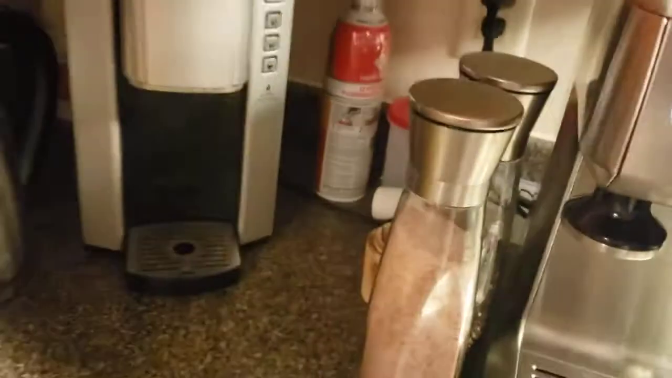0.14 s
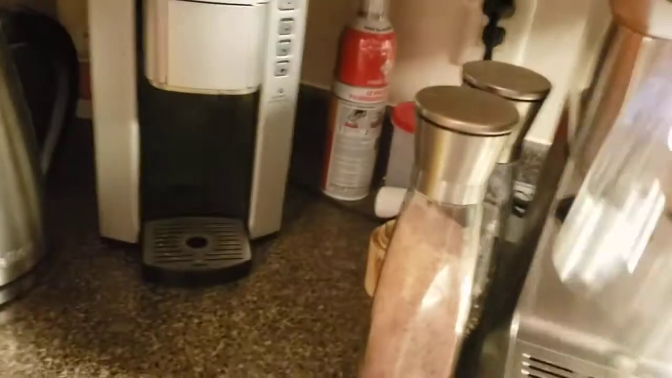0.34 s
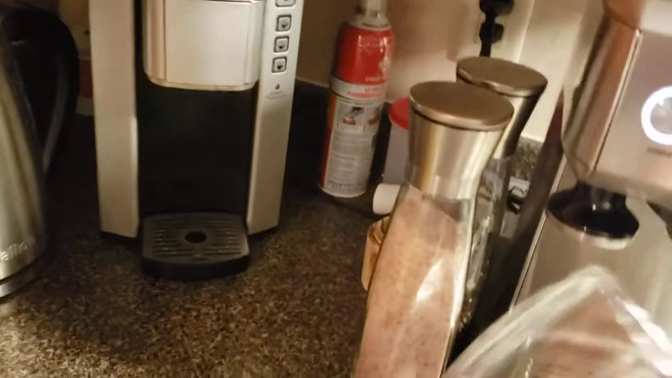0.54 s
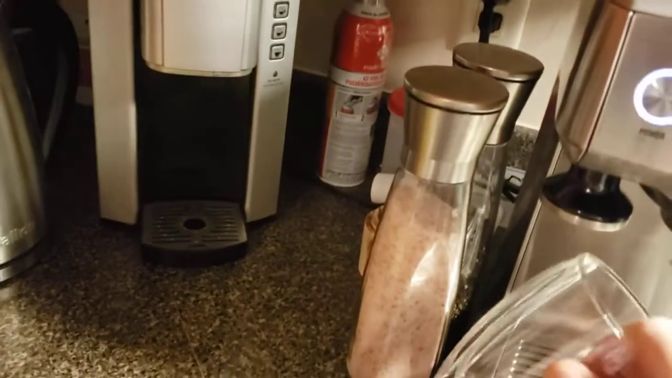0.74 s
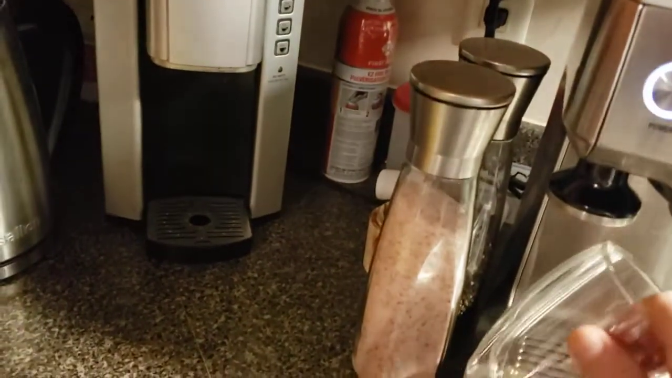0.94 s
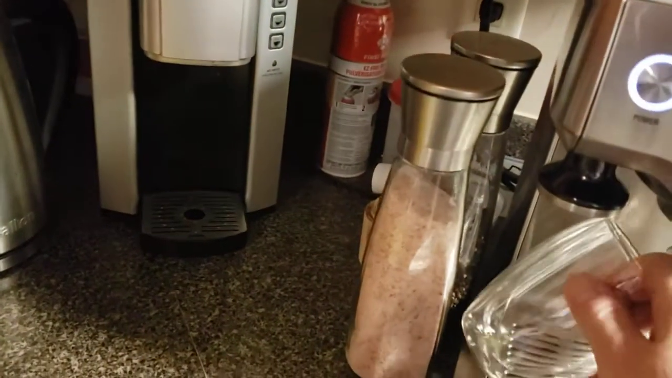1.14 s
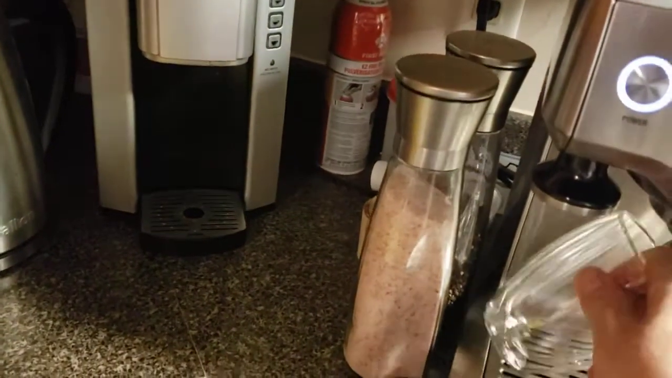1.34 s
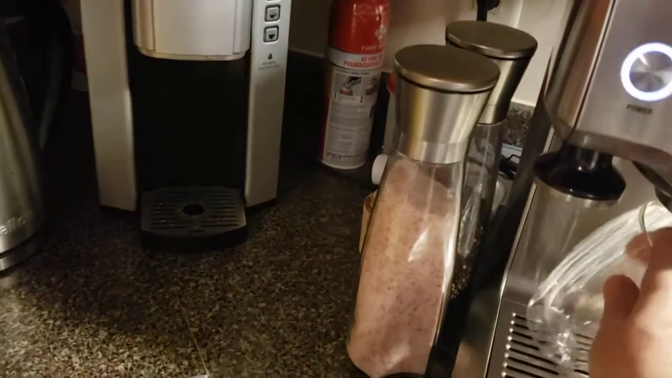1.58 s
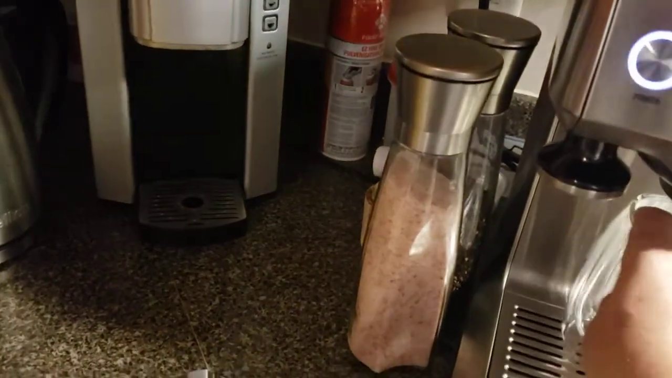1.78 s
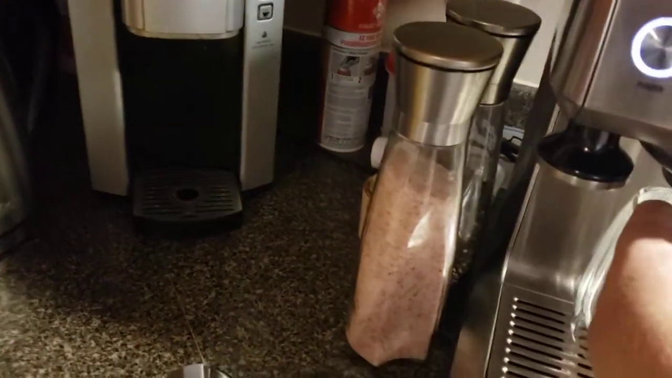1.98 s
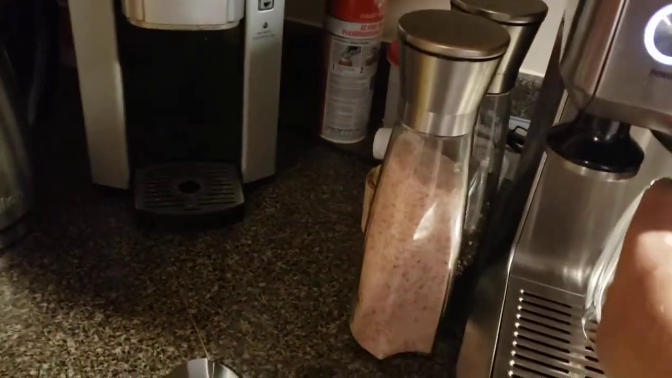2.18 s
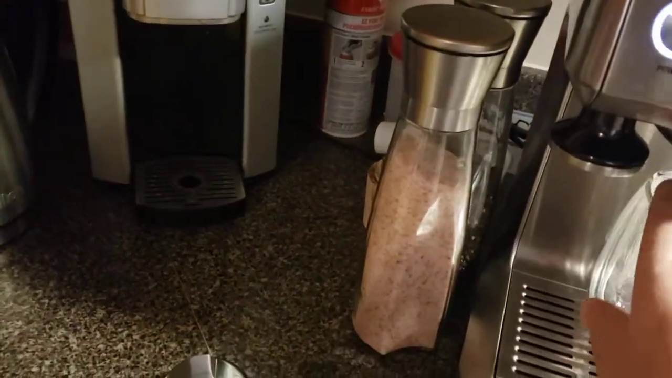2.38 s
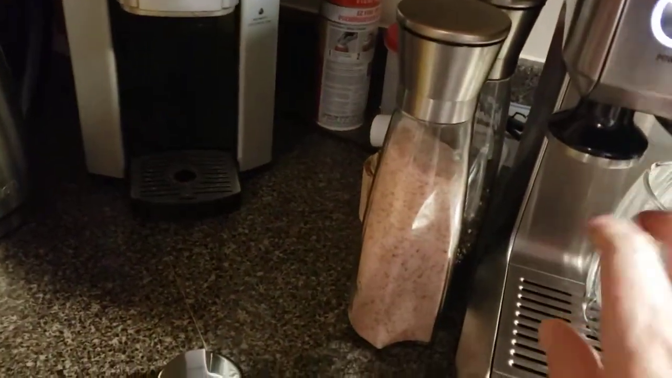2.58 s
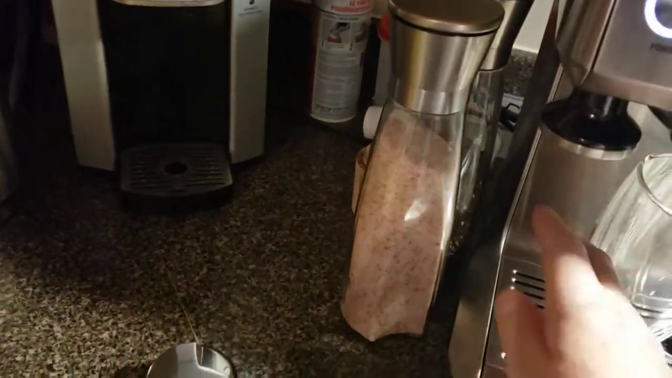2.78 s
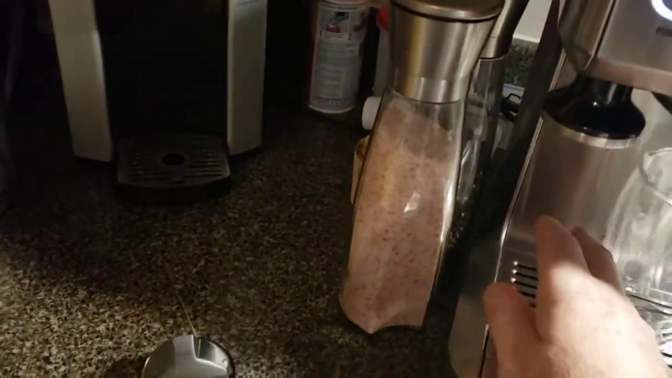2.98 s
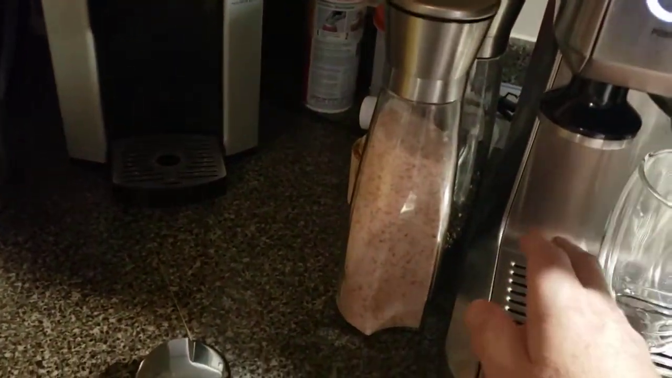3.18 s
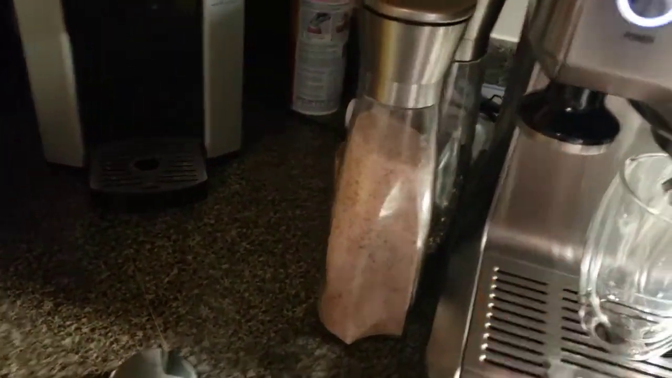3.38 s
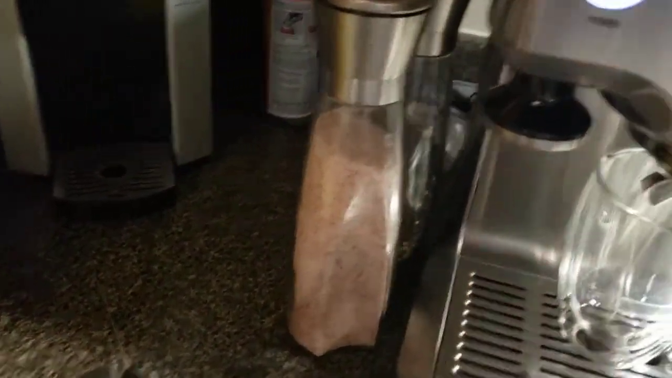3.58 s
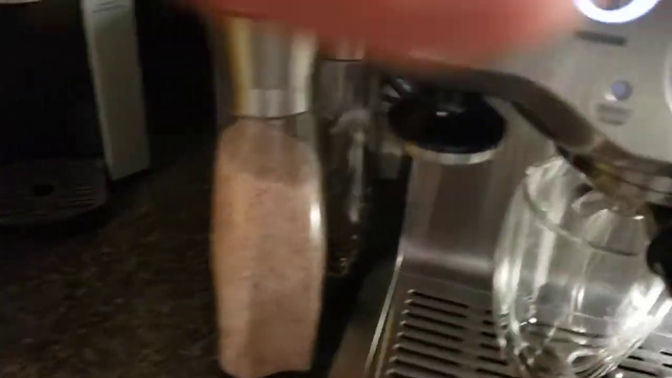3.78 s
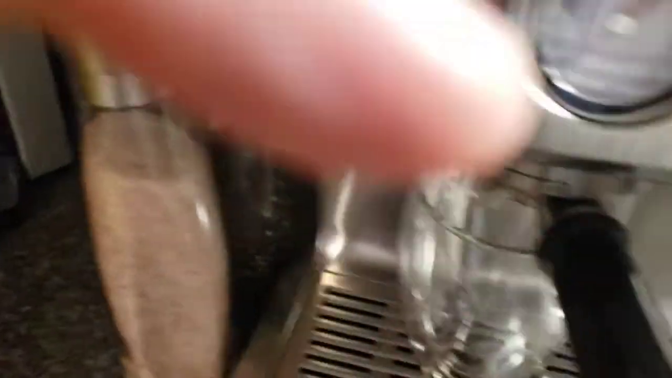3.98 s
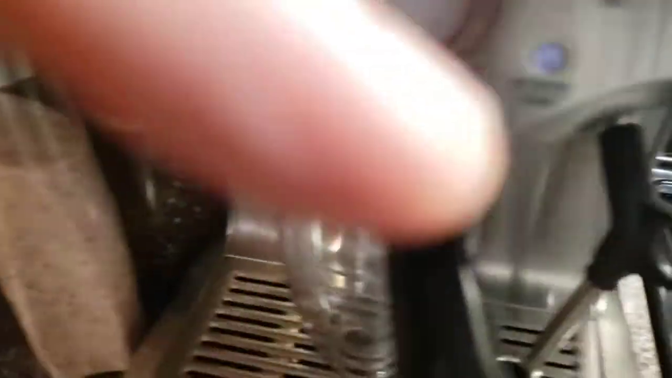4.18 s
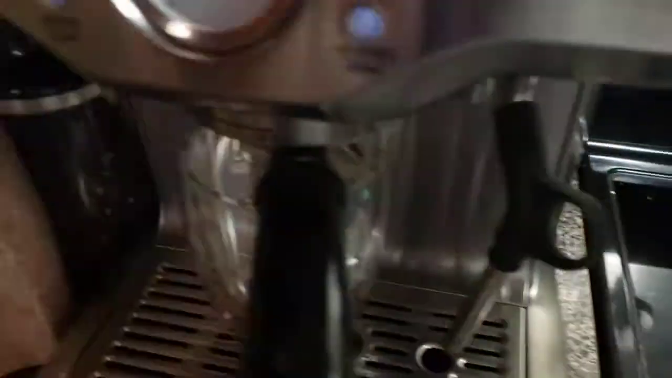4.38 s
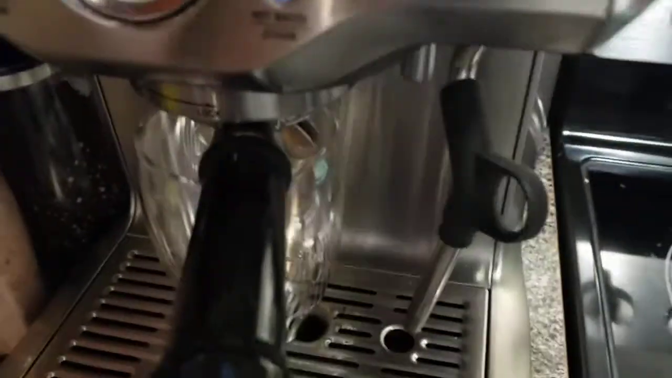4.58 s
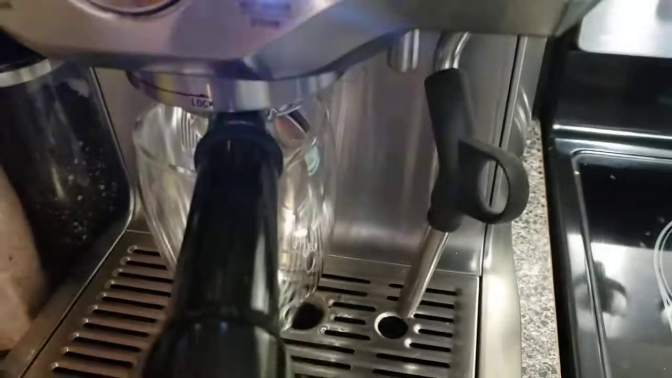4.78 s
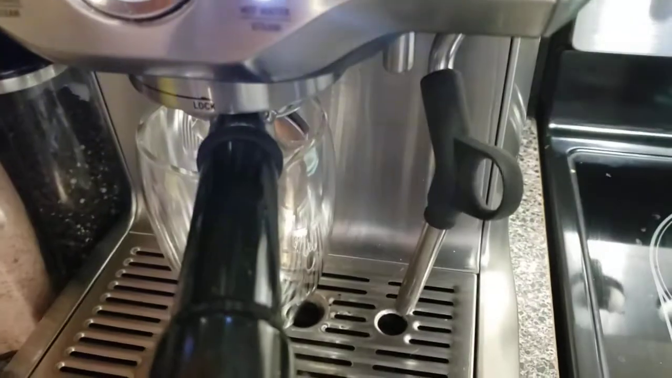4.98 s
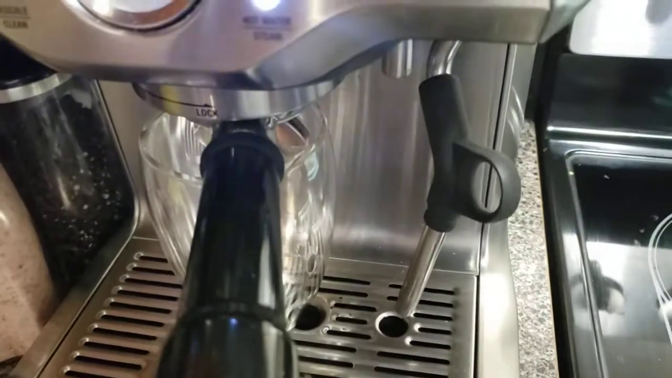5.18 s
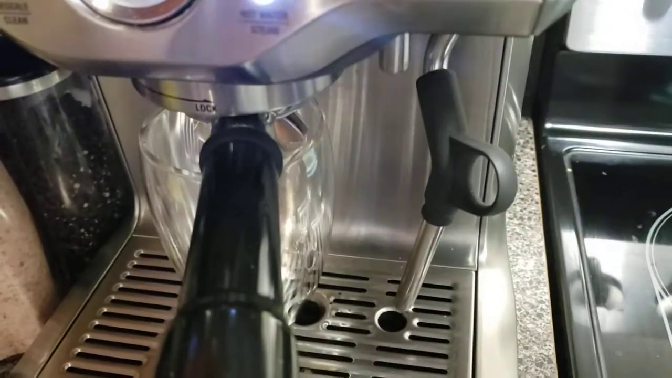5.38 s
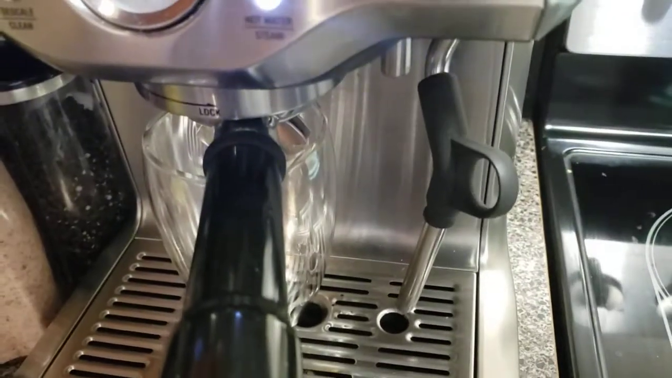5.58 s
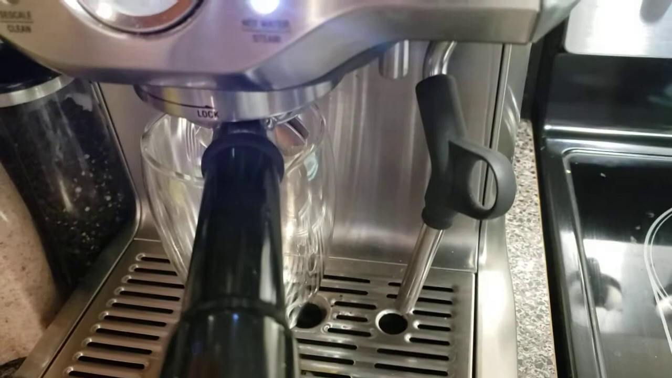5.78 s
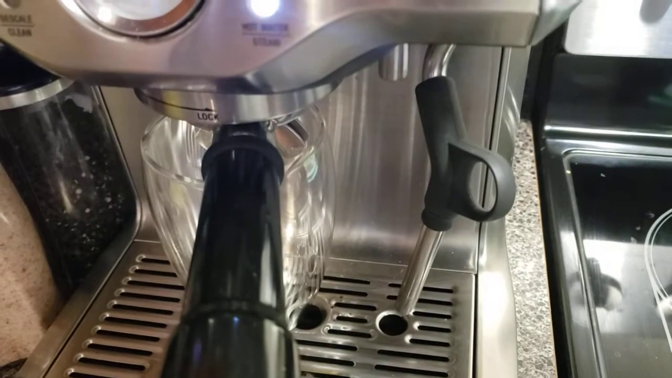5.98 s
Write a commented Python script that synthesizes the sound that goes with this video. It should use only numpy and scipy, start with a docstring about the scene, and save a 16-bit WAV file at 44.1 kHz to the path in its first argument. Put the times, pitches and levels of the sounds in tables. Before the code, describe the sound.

A glass jug squeaks, knocks and chatters on a metal drip tray, then a button clicks and an espresso machine's pump buzzes steadily.

```python
"""Espresso machine in a small kitchen, heard close up by a hand-held phone over faint air noise and hum.
A glass jug squeaks off the counter (noise-driven resonance) amid dull bumps, finger scuffs and taps.
From 1.4 s it knocks, slides and sings on the steel (noise cracks, decaying modes, grainy noise); from 2.3 s
its foot chatters on the drip tray. From 4.55 s a button clicks and the valve snaps; at 4.84 s the vibration
pump starts to buzz (harmonics plus noise bursts at each stroke)."""
import sys
import numpy as np
from scipy import signal
from scipy.fft import rfft, irfft, next_fast_len
from scipy.io import wavfile

SR = 44100
rng = np.random.default_rng(int(sys.argv[2]) if len(sys.argv) > 2 else 0)


def put_to_file(sound):
    """Save the sound as 16-bit audio at rate SR, in the file named by the first command-line argument."""
    columns = np.atleast_2d(sound).T  # one column per channel
    safe = np.clip(columns, -1, 1)
    whole_steps = np.round(safe * 32767)
    wavfile.write(sys.argv[1], SR, whole_steps.astype(np.int16))


N = 266364
T = np.arange(N) / SR
STROKE_HZ, FIRST_STROKE_S = 59.95, 4.8418

# edges of the five bands of a crack: f/Hz
BANDS_HZ = [170, 1000, 2700, 4500, 10000, 16000]


def amp(db):
    """Decibels to gain."""
    return 10 ** (np.asarray(db) / 20)


def unit(x):
    """Scale to rms 1."""
    return x / np.sqrt(np.mean(x ** 2))


def colour(x, points):
    """Filter by a spectrum of (f/Hz, gain/dB) points, joined over log frequency."""
    hz, db = np.transpose(points)
    size = next_fast_len(x.shape[-1] + 2048)
    f = np.maximum(np.fft.rfftfreq(size, 1 / SR), 1)
    gain = amp(np.interp(np.log(f), np.log(hz), db))
    return irfft(rfft(x, size) * gain, size)[..., :x.shape[-1]]


def band(x, lo_hz, hi_hz, order=3):
    """Causal band-pass."""
    edges_hz = [lo_hz, min(hi_hz, SR / 2 - 1)]
    return signal.sosfilt(signal.butter(order, edges_hz, "band", fs=SR, output="sos"), x)


def noise(size, apart_hz=1500):
    """Noise at two close ports: alike in the bass, unrelated in the treble."""
    mid, side = rng.standard_normal((2, size))
    side = signal.sosfilt(signal.butter(1, apart_hz, "high", fs=SR, output="sos"), side)
    return np.array([mid + side, mid - side])


def walk(rate_hz):
    """Random curve with a spread near 1: a new target rate_hz times a second, held after 4096 targets."""
    return 1.2 * np.interp(T * rate_hz, np.arange(4096), rng.standard_normal(4096))


def add(out, s, sound):
    """Mix a sound in at time s."""
    i = max(int(s * SR), 0)
    out[:, i:i + sound.shape[-1]] += sound[..., :N - i]


def fade(t, t60):
    """Exponential decay, 60 dB in t60 seconds."""
    return np.exp(-np.log(1000) * t / t60)


def swell(s, half_s):
    """A smooth rise and fall that peaks at time s."""
    return np.exp(-((T - s) / half_s) ** 2)


def held(start_s, end_s, attack_s, t60):
    """Attack, hold and release."""
    return np.clip((T - start_s) / attack_s, 0, 1) * fade(np.maximum(T - end_s, 0), t60)


def narrow(hz, width_hz):
    """A resonance kept going by an uneven push."""
    phase = 2 * np.pi * np.cumsum(hz * np.ones(N)) / SR
    return unit(walk(width_hz) * np.sin(phase) + walk(width_hz) * np.cos(phase))


def kitchen():
    """Faint air noise, a wavering low hum and a thin whine."""
    # air spectrum: f/Hz, relative level/dB
    air_spectrum = [(76, -50.5), (130, -21.5), (159, -29.5), (176, -18), (198, -4), (233, -17),
                    (328, -16.5), (481, -32.5), (522, -29), (846, -36), (898, -38), (994, -41),
                    (5500, -45.5), (12600, -40.5), (16000, -29.5)]
    # hum and whine: f/Hz, width/Hz, level/dB
    hum_lines = [(54.7, 11, -60.5), (90, 34, -73), (6500, 290, -95), (12680, 900, -79.5)]
    air_db = -64.5 + 0.42 * walk(3.4)
    air = unit(colour(noise(N), air_spectrum)) * amp(air_db)
    return air + sum(amp(db) * narrow(hz, width_hz) for hz, width_hz, db in hum_lines)


def thumps():
    """Bumps through counter and hand: low resonances that swell and die within a few cycles."""
    # bumps: t/s, f/Hz, peak level/dB
    bumps = [(0.0, 89, -34), (0.07, 93, -41.5), (1.422, 92.5, -29.5), (1.478, 89.2, -36.5),
             (1.758, 195, -33), (1.76, 86.9, -35), (1.861, 53.6, -31.5), (2.32, 90, -40.5),
             (3.021, 90, -42.5), (3.87, 62.5, -45), (4.278, 91.2, -36), (4.629, 88.3, -26),
             (4.862, 95, -21)]
    swell_cycles = 1.5
    out, t = np.zeros((2, N)), T[:SR // 2]
    for s, hz, db in bumps:
        age = t * hz / swell_cycles
        envelope = age * np.exp(1 - age)
        add(out, s, amp(db) * envelope * np.sin(2 * np.pi * hz * t))
    return out


def handling():
    """The jug squeaks off the counter; the hand rumbles through the phone's body and fingers tap on its case."""
    # hand shakes: peak t/s, level/dB
    shakes = [(0, -40.5), (1.759, -53), (2.42, -51), (3.04, -53), (3.92, -60), (4.28, -60.5), (4.73, -47)]
    # fingertips on the case: t/s, initial level/dB
    taps = [(.128, -60.5), (3.893, -58), (4.092, -59.5), (4.23, -58), (4.275, -64)]
    squeak_db, squeak_end_s, squeak_t60_s = -37, 0.072, 0.086
    squeak_hz, rise_hz_per_s = 623, 2000
    grip_db, grip_from_s = -67.5, 1.4  # faint rumble while the other hand works

    pitch_hz = squeak_hz + rise_hz_per_s * np.minimum(T, squeak_end_s)
    out = amp(squeak_db) * held(0, squeak_end_s, 0.002, squeak_t60_s) * narrow(pitch_hz, width_hz=140)
    rumble = amp(grip_db) * held(grip_from_s, FIRST_STROKE_S, 0.092, 0.3)
    rumble = rumble + sum(amp(db) * swell(s, half_s=0.11) for s, db in shakes)
    out = out + rumble * unit(band(noise(N), 33, 260, order=2))
    t = T[:SR // 4]
    for s, db in taps:
        add(out, s, amp(db) * fade(t, 0.047) * unit(band(noise(len(t)), 390, 1570, order=2)))
    return out


def rubbing():
    """Grainy friction of skin, cloth and sliding glass, which now and then catches a resonance."""
    # scuffs of sleeve, fingers and jug near the phone:
    # peak t/s, half length/s, relative level/dB, brightness/dB per band step
    brushes = [(.01, 0.024, -49.5, -9.5), (.068, 0.02, -54, -13.5), (.13, .06, -79, 1),
               (1.24, .07, -86.5, 13), (1.96, 0.086, -65.5, -5.5), (2.04, 0.049, -70.5, -0.5),
               (3.31, 0.049, -83.5, -12), (3.44, 0.063, -64.5, 2), (3.57, 0.22, -78, 8),
               (3.88, 0.074, -73, 4), (3.99, 0.032, -65, 12.5), (4.116, 0.064, -66.5, 7),
               (4.26, 0.047, -74, -4), (4.47, 0.13, -77.5, 6)]
    # jug sliding over steel: same columns
    slides = [(1.57, 0.075, -57.5, 0.5), (1.63, 0.02, -56, 1.5), (1.715, 0.029, -51, 3.5),
              (1.745, 0.015, -41, -0.5), (1.87, 0.038, -59.5, -2.5)]
    # low, middle, top offsets of each kind: level/dB
    brush_db = [6, -1, 4]
    slide_db = [2, -0.5, -4]
    # metal singing under the glass: peak t/s, half length/s, f/Hz, level/dB
    sings = [(1.58, 0.016, 2990, -65.5), (1.642, 0.021, 2975, -58), (1.722, 0.039, 2944, -49.5),
             (1.723, 0.052, 1640, -55.5), (1.743, 0.0053, 4210, -42), (1.9, 0.069, 3045, -64),
             (1.97, 0.014, 3010, -64), (2.051, 0.019, 2890, -70.5), (1.98, 0.073, 901, -63),
             (2.183, 0.06, 620, -66), (3.166, .08, 1460, -77)]

    slope = np.linspace(-1, 1, 3)  # brightness lowers the low band and lifts the top
    levels = np.zeros((3, N))
    for rubs, offsets_db in ((slides, slide_db), (brushes, brush_db)):
        for s, half_s, db, bright in rubs:
            band_dbs = db + np.array(offsets_db) + bright * slope
            levels += np.outer(amp(band_dbs), swell(s, half_s))
    low, mid, top = levels
    grain = amp(0.74 * walk(130))
    hiss = amp(-7) * low * unit(band(noise(N), 300, 900, order=3))
    hiss = hiss + amp(-3) * mid * unit(band(noise(N), 1320, 4400, order=2))
    hiss = hiss + amp(2.5) * top * unit(band(noise(N), 14000, 20000, order=2))
    singing = sum(amp(db) * swell(s, half_s) * narrow(hz, width_hz=0.11 * hz)
                  for s, half_s, hz, db in sings)
    return grain * hiss + singing


def ring(modes, t60, tail_db, tail_t60, split, scatter_db):
    """Pairs of close modes: damped fast by the contact, then ringing on faintly; rms 1 over 20 ms."""
    t, out = T[:SR // 2], 0
    for hz, db in modes:
        phase = rng.uniform(0, 2 * np.pi, (2, 2, 1))
        twin_hz = hz * (1 - split * rng.uniform(0.14, 1))
        decay = fade(t, t60) + amp(tail_db) * fade(t, tail_t60)
        main = np.sin(2 * np.pi * hz * t + phase[0]) * decay
        twin = 0.5 * np.sin(2 * np.pi * twin_hz * t + phase[1]) * fade(t, t60)
        out = out + amp(db + scatter_db * rng.standard_normal()) * (main + twin)
    return out / np.sqrt(np.mean(out[:, :SR // 50] ** 2))


def crack(band_dbs, t60, low_stretch):
    """The dense, uneven short modes of a casing, band by band; the lowest ring longest."""
    gap_hz, gap_octaves, gap_db = 2571, 0.2, -8  # the casing has few modes here
    t, out = T[:SR // 2], 0
    hz = np.geomspace(200, 16000, 110)
    gap = gap_db * np.exp(-(np.log2(hz / gap_hz) / gap_octaves) ** 2)
    ripple_db = 4.37 * rng.standard_normal(len(hz)) + gap
    modes = colour(noise(len(t)), np.column_stack([hz, ripple_db]))
    for k, db in enumerate(band_dbs):
        decay = fade(t, t60 * (low_stretch if k == 0 else 1))
        out = out + amp(db) * unit(band(modes, BANDS_HZ[k], BANDS_HZ[k + 1])) * decay
    return out


def knocks():
    """Blows, each with its own strength and brightness, crack and ring parts; one hits the filter holder."""
    # blows on machine, button and valve:
    # t/s, relative level/dB, brightness/dB per octave, clang/dB, t60/s, strongest f/Hz
    blows = [(1.416, -29, 2.5, -10, 0.11, 3056), (1.446, -39, 2, -5, 0.084, 3040),
             (1.524, -61.5, -5, -5.5, .05, 1750), (1.628, -52, -0.3, 0, 0.11, 3040),
             (1.75, -27.5, 2.2, 4, 0.079, 7290), (3.007, -44, 3, 0, 0.099, 6400),
             (3.0166, -39, 3.5, -1, .13, 3330), (3.069, -55.5, 5.5, 11.5, 0.12, 7500),
             (4.5505, -32, 1.5, -6, 0.065, 687), (4.613, -36, -1.1, -0.7, 0.061, 3560),
             (4.726, -50, 0.8, 1.5, 0.22, 1770), (4.768, -48, -4, 2, 0.045, 1720),
             (4.805, -45.2, -1.6, -9, 0.1, 7060), (4.8252, -26, 1.3, -1.5, 0.032, 7100),
             (4.834, -32.5, -0.3, 8.5, 0.027, 6680)]
    # colour that all blows share, per band: level/dB
    casing_db = [0.5, 2.5, -0.5, -4, -1]
    # steel panels: f/Hz, relative level/dB
    panel_modes = [(511.4, -70.5), (629.8, -73.5), (893.6, -76), (1340, -77.5), (1793, -93), (2234, -96.5)]
    # filter holder: f/Hz, relative level/dB
    holder_modes = [(1911, -46), (2988, -40), (4204, -50), (4597, -67), (5087, -55), (5529, -60),
                    (6013, -56.5), (6460, -60.5), (7110, -46), (8323, -44), (9082, -67), (9975, -60),
                    (11332, -59), (12145, -58.5), (12602, -57), (13098, -58.5), (13910, -54.5),
                    (14863, -47.5)]
    clang_hz, clang_octaves = 3200, 1.1  # centre and half width; brightness pivots here
    holder_hit_s, holder_db = 1.749, -26

    out, edges = np.zeros((2, N)), np.array(BANDS_HZ)
    octaves = np.log2(np.sqrt(edges[:-1] * edges[1:]) / clang_hz)
    clang_shape = np.exp(-(octaves / clang_octaves) ** 2)
    for s, db, bright, clang_db, t60, hz in blows:
        band_dbs = db + np.array(casing_db) + bright * octaves + clang_db * clang_shape
        own_db = band_dbs[np.searchsorted(BANDS_HZ, hz) - 1]  # band that holds the strongest mode
        part = ring([(hz, 0)], t60=0.029, tail_db=-25.5, tail_t60=0.31, split=0.042, scatter_db=0)
        panels = ring(panel_modes, t60=0.71, tail_db=-10.5, tail_t60=0.94, split=0.042, scatter_db=5)
        add(out, s, amp(3.5) * crack(band_dbs, t60, low_stretch=1.87))
        add(out, s, amp(own_db - 1.5) * part)
        add(out, s, amp(band_dbs[1] - 23) * panels)
    holder = ring(holder_modes, t60=0.081, tail_db=-31, tail_t60=0.3, split=0.0073, scatter_db=3)
    add(out, holder_hit_s, amp(holder_db) * holder)
    return out


def clinks():
    """The jug's foot ticks on the tray; its wall rings, its pitch varying with the grip, under overtones."""
    # taps: t/s, relative tick level/dB, ring level/dB, ring f/Hz
    tray_taps = [(2.3017, -42, -41.5, 3130), (2.309, -43, -31.5, 3320), (2.3662, -41.5, -40.5, 3325),
                 (2.379, -44, -36.5, 3360), (2.393, -59, -37, 3345), (2.4731, -47, -45, 3370),
                 (2.5755, -59, -46.5, 3300), (2.9503, -57.5, -46.5, 3265), (2.969, -46.5, -38, 3250)]
    # glass overtones: f/Hz, relative level/dB
    glass_modes = [(1599, -61), (2202, -63.5), (3327, -58.5), (3698, -55.5), (5190, -57), (7138, -65.5),
                   (7736, -62), (8328, -59), (9162, -69), (9943, -102), (12242, -70), (12608, -58),
                   (13921, -68), (14734, -55)]
    out = np.zeros((2, N))
    for s, tick_db, ring_db, hz in tray_taps:
        high_db = (tick_db + ring_db) / 2  # overtones need both a sharp tick and a free wall
        band_dbs = [tick_db - 6, tick_db, ring_db - 18, high_db - 8, tick_db - 2.5]
        wall = ring([(hz, 0)], t60=0.13, tail_db=-36, tail_t60=0.22, split=0.0414, scatter_db=0)
        overtones = ring(glass_modes, t60=0.146, tail_db=-33.5, tail_t60=0.25, split=0.0217, scatter_db=1.5)
        add(out, s, amp(3.5) * crack(band_dbs, t60=0.1, low_stretch=1.57))
        add(out, s, amp(ring_db) * wall)
        add(out, s, amp(high_db + 1.2) * overtones)
    return out


def strokes(shape, repeat, t60, uneven_db, lag_s):
    """Every piston stroke rings a response: partly repeated, drifting as pressure builds, partly fresh."""
    out, t = np.zeros((2, N)), T[:SR // 16]
    envelope = fade(t, t60) * (1 - np.exp(-t / 0.0011))
    slack, loaded, skip = (noise(len(t)) for _ in range(3))
    times = np.arange(FIRST_STROKE_S, N / SR, 1 / STROKE_HZ)
    for k, s in enumerate(times):
        pressure = k / len(times)
        alternating = 0.41 * (-1) ** k * skip  # every second stroke differs
        same = unit((1 - pressure) * (slack + alternating) + pressure * loaded)
        response = np.sqrt(repeat) * same + np.sqrt(1 - repeat) * unit(noise(len(t)))
        gain = amp(uneven_db * rng.standard_normal())
        add(out, min(s + lag_s, T[-1]), gain * envelope * response)
    # rms near 1 over the running time
    return unit(colour(out, shape)) * np.sqrt(1 - FIRST_STROKE_S * SR / N)


def pump():
    """A mains-driven piston: casing hums, rocks at half the stroke rate, rattles and ticks at each stroke."""
    # harmonics: multiple of half the stroke rate, relative level/dB
    orders = [(1, -26), (2, 4.5), (3, -11.5), (4, -6), (5, -18), (6, -11.5), (7, -2), (8, -6.5), (9, -22),
              (10, -9.5), (11, -19.5), (12, -17), (13, -27.5), (14, -15), (15, -53), (16, -28.5)]
    # spells of rocking while the pump fills: start t/s, end t/s, level/dB
    rocking_spells = [(4.845, 4.883, -34.5), (4.968, 5.175, -34.5), (5.298, 5.611, -33)]
    # stroke spectra, each: f/Hz, relative level/dB
    body_shape = [(280, -14), (480, -3), (509, -8.5), (584, 3.5), (806, 1), (1010, -5.5), (1100, 0.5),
                  (1190, -4), (1700, -8), (2210, -32.5), (3740, -120)]
    rattle_shape = [(880, -17.5), (1500, 2.5), (1660, -12), (1830, 5), (2090, -0.5), (2200, 1), (2830, -3),
                    (3100, -5.5), (3370, -1), (3600, -7), (3980, 1.5), (4980, -11), (6840, -8), (9080, -15),
                    (11000, -12.5), (14300, -42), (22000, -120)]
    tick_shape = [(5880, -47), (10000, -17.5), (11600, -7), (12600, -9), (13900, 3), (14900, 0.5),
                  (16000, -19)]

    running_s = np.maximum(T - FIRST_STROKE_S, 0)
    on = np.clip((T - FIRST_STROKE_S) * STROKE_HZ + 1, 0, 1)  # builds up in one stroke
    rocking = amp(-52.5) * on
    for start_s, end_s, db in rocking_spells:
        rocking = rocking + amp(db) * held(start_s, end_s, attack_s=0.034, t60=0.53)
    # water churns steadily, with a swell around 5.2 s
    water = on * (amp(-47.5) + amp(-38) * swell(5.204, half_s=0.24))

    # levels at switch-on/dB and slopes/(dB/s) as pressure builds, with a waver under load
    waver_db = 1.86
    body = amp(-39.5 + waver_db * walk(9))
    rattle = amp(-39.5 - 1.8 * running_s + waver_db * walk(9))
    tick = amp(-42 + 2 * running_s + waver_db * walk(9))

    half_turn = np.pi * STROKE_HZ * (T - FIRST_STROKE_S)  # phase at half the stroke rate
    lines = [0, 0]  # even orders hum, odd orders rock
    for k, (_, db) in enumerate(orders, start=1):
        waver = np.clip((k - 1.5) / 7, 0, 1)  # upper partials are less steady
        level = amp(db + 4.4 * waver * walk(8.4))
        phase = k * half_turn + 0.54 * waver * walk(10) + rng.uniform(0, 2 * np.pi)
        lines[k % 2] = lines[k % 2] + level * np.cos(phase)
    drone = amp(-29.2) * on * unit(lines[0]) + rocking * unit(lines[1])
    churn = water * unit(band(noise(N), 156, 384))
    low_hum = amp(-36) * on * narrow(92, width_hz=22)
    buzz = body * strokes(body_shape, repeat=0.51, t60=0.097, uneven_db=1.5, lag_s=0.005)
    buzz = buzz + rattle * strokes(rattle_shape, repeat=0.18, t60=0.086, uneven_db=1.33, lag_s=0.00066)
    buzz = buzz + tick * strokes(tick_shape, repeat=0.23, t60=0.0487, uneven_db=3, lag_s=0.0001)
    return drone + churn + low_hum + buzz


def room(x, wet_db, low_t60, high_t60):
    """Counter, cupboards and walls answer with a short diffuse tail."""
    t = T[:SR]
    tail = band(noise(SR), 200, 3700, order=1) * fade(t, low_t60)
    tail = tail + band(noise(SR), 2400, 15000, order=1) * fade(t, high_t60)
    tail = tail * (1 - np.exp(-t / 0.0027))
    tail = tail / np.sqrt(np.sum(tail ** 2) / 2)
    return x + amp(wet_db) * signal.fftconvolve(x, tail, axes=1)[:, :N]


def scene():
    """Machine and rubbing sounds pass through the room and the port shadow; the rest is added directly."""
    # right port faces away from the machine: f/Hz, left minus right level/dB
    shadow = [(700, -1), (1300, 5), (2000, 7), (3300, 12.5), (5000, 6), (8000, 17), (10500, -2),
              (12500, -1), (15000, 5.5)]
    near = room(knocks() + clinks() + rubbing() + pump(), wet_db=-13, low_t60=0.3, high_t60=0.19)
    bass = [(300, 0)]  # long waves bend round the phone and reach both ports alike
    ports = []
    for x, side in zip(near, (1, -1)):
        ports.append(colour(x, bass + [(hz, side * db / 2) for hz, db in shadow]))
    return np.array(ports) + thumps() + handling() + kitchen()


def record(dry):
    """The two microphones shift the bass against each other; the phone cuts the top."""
    f = np.fft.rfftfreq(2 * N, 1 / SR)
    lead_rad = 0.49 / (1 + (f / 700) ** 4)  # left leads in the bass
    shift = np.exp(0.5j * np.array([lead_rad, -lead_rad]))
    ports = irfft(rfft(dry, 2 * N) * shift)[:, :N]
    top_hz = 15850
    return signal.sosfilt(signal.ellip(10, 0.2, 70, top_hz, fs=SR, output="sos"), ports)


dry = scene()
out = record(dry)
put_to_file(out)
```